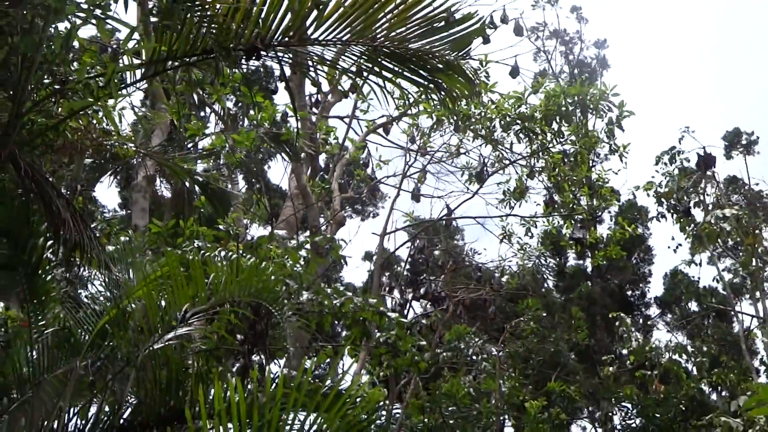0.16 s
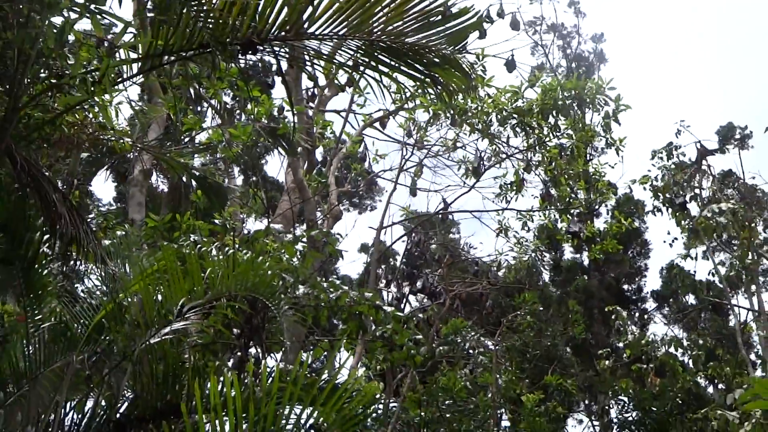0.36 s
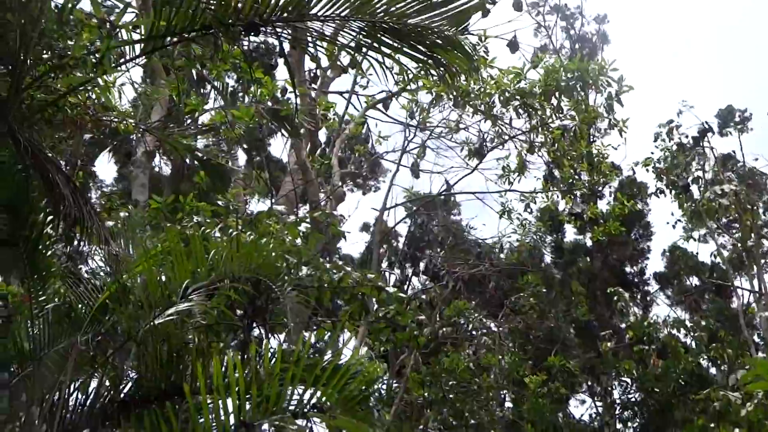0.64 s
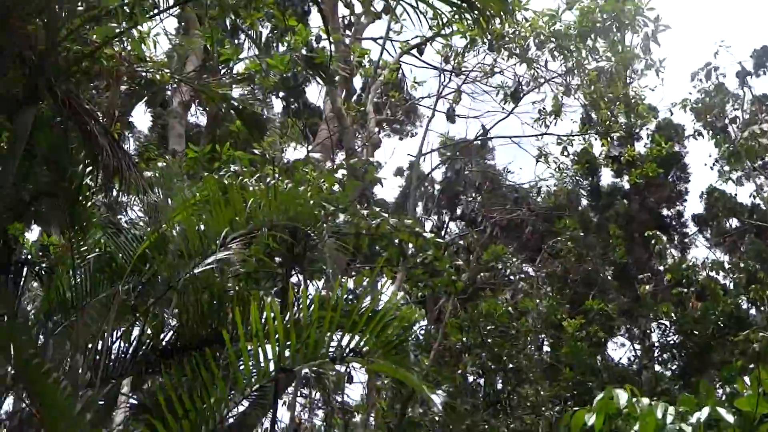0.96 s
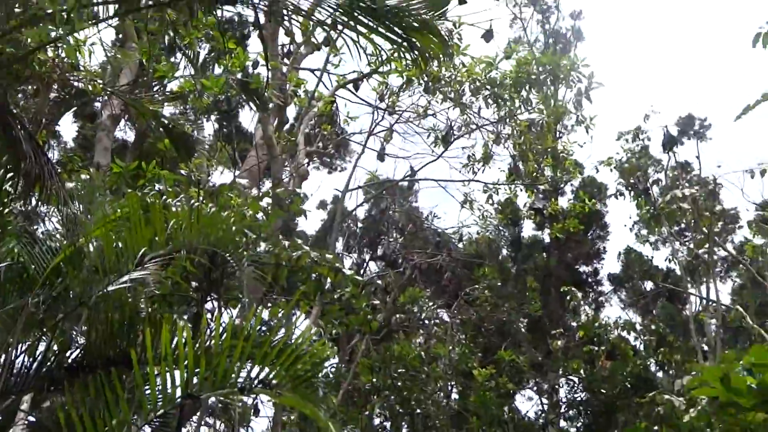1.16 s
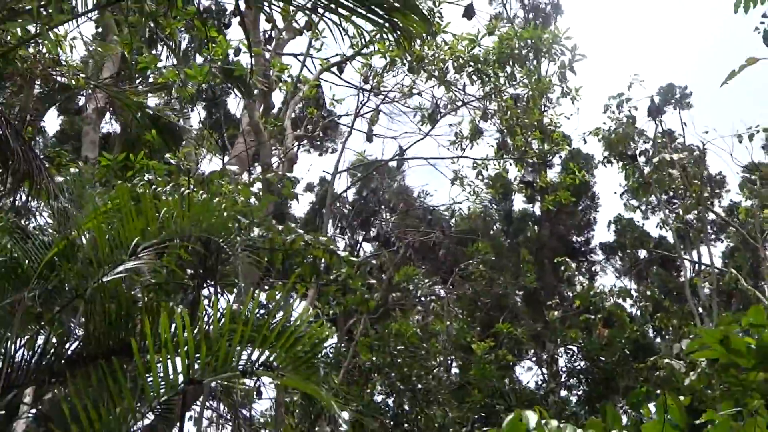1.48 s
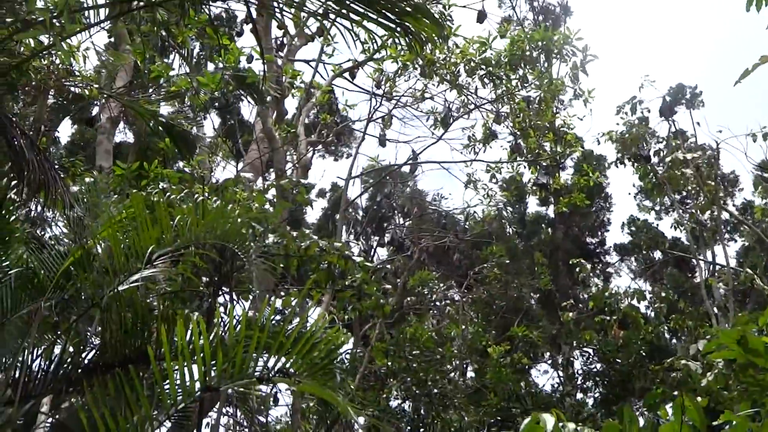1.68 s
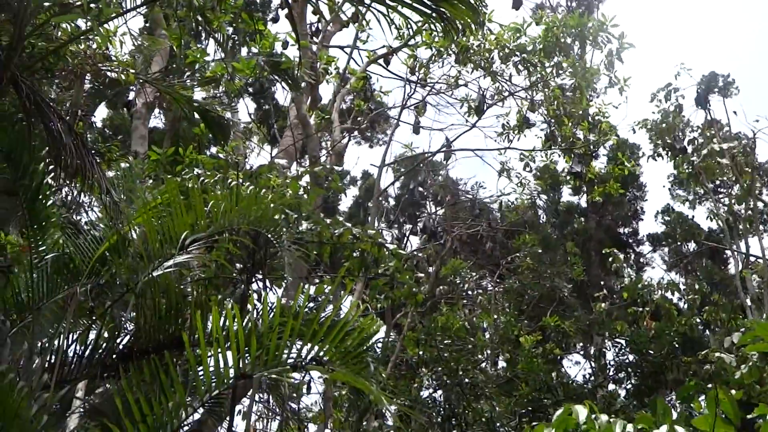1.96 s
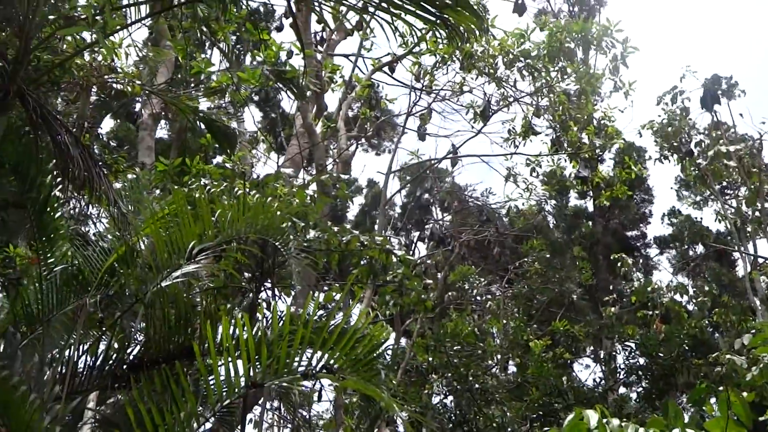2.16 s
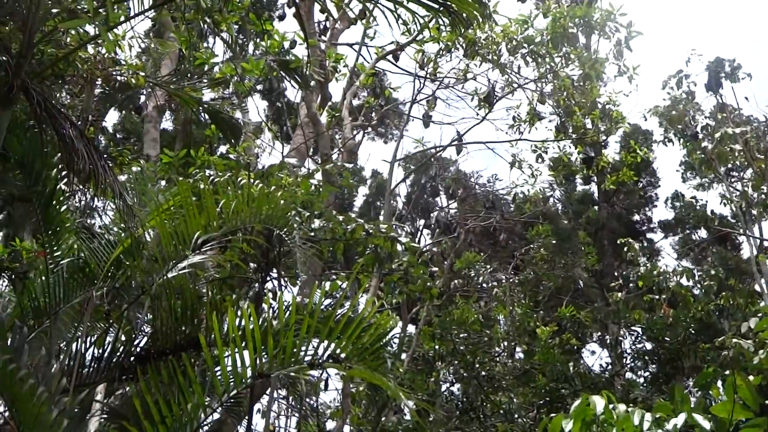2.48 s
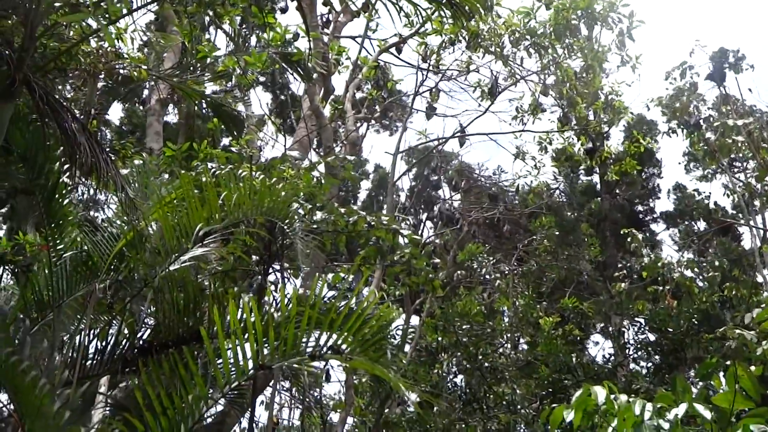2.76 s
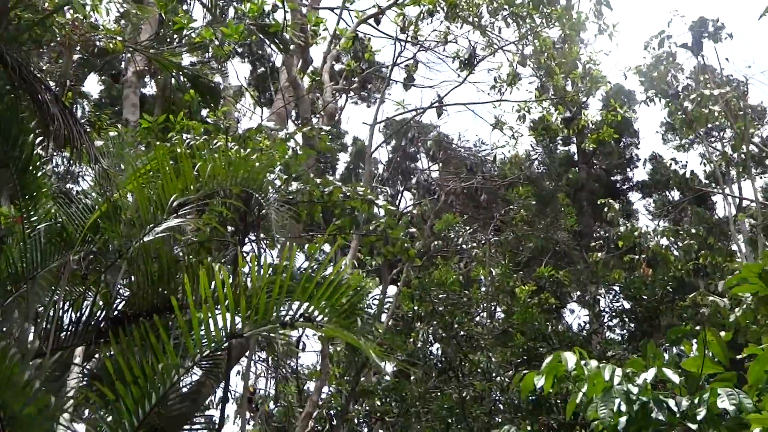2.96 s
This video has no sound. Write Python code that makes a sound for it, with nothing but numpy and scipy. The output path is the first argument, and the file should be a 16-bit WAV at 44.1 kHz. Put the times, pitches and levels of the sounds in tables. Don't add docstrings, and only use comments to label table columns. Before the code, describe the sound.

Harsh bat screeches and squeals, then quick chattering notes, above insect buzz and soft forest wash.

```python
import sys
import numpy as np
from scipy import signal
from scipy.fft import rfft, irfft
from scipy.io import wavfile
from scipy.ndimage import uniform_filter1d

SR = 44100
rng = np.random.default_rng(int(sys.argv[2]) if len(sys.argv) > 2 else 0)


def inscribe(sig):
    pcm = np.round(np.clip(np.atleast_2d(sig).T, -1, 1) * 32767)
    wavfile.write(sys.argv[1], SR, pcm.astype(np.int16))


def decibels_to_gain(level_db):
    exponent = np.asarray(level_db, float) / 20
    return 10 ** exponent


N = 138033


def evened(x):
    return x / np.sqrt(np.mean(x ** 2) + 1e-20)


def read(points, hz):
    f, value = np.transpose(points)
    return np.interp(np.log(hz + 1), np.log(f + 1), value)


def add(mix, s, sound):
    part = mix[round(s * SR):][:len(sound)]
    part += sound[:len(part)]


def wander(length, seconds):
    size = max(int(seconds * SR), 1)
    drift = uniform_filter1d(rng.standard_normal(length + SR // 10), size)
    return evened(uniform_filter1d(drift, size))[:length]


def resonate(x, hz, width):
    turn = np.exp(2j * np.pi * np.cumsum(hz * np.ones(len(x))) / SR)
    r = np.exp(-np.pi * width / SR)
    return 2 * (turn * signal.lfilter([1 - r], [1, -r], x / turn)).real


def resonate_twice(x, hz, width):
    return resonate(resonate(x, hz, width), hz, 2 * width)


def follow(points):
    s, hz, db, *more = np.transpose(points)
    t = np.arange(s[0], s[-1], 1 / SR)
    ends = np.minimum(np.minimum(t - s[0], s[-1] - t) / 0.0024, 1)
    return s[0], np.interp(t, s, hz), ends * decibels_to_gain(np.interp(t, s, db)), *(np.interp(t, s, m) for m in more)


def wash():
    # pitch_hz, level_db per Hz
    wash_curve = [(25, -44), (100, -20), (280, -6.5), (650, -2.5), (1400, -7), (3500, -12), (8000, -16),
                  (15600, -29.5)]
    # pitch_hz, likeness (0-1)
    likeness_curve = [(60, .995), (500, 0.93), (1000, 0.86), (6000, 0.88), (13000, 0.98)]
    # pitch_hz, level_db
    lean_curve = [(250, 0), (1000, 1), (8000, -0.7)]
    # pitch_hz, phase_radians
    lead_curve = [(0, 0), (130, 0.13), (1550, 0.47), (4390, 0.13), (7320, 0.42), (15300, 0.13)]
    hz = np.fft.rfftfreq(1024, 1 / SR)
    a, b, c, d, patches = rng.standard_normal((N // 256 + 5, 513, 5)).T
    patches = evened(uniform_filter1d(uniform_filter1d(patches, 10, 0), 12, 1))
    same = np.clip(read(likeness_curve, hz), -1, 1)[:, None]
    lean = decibels_to_gain(read(lean_curve, hz)[:, None] / 2)
    lead = np.exp(1j * read(lead_curve, hz))[:, None]
    left = a + 1j * b
    right = same * left + np.sqrt(1 - same ** 2) * (c + 1j * d)
    z = np.array([left * lean * lead, right / lean])
    z *= decibels_to_gain(read(wash_curve, hz)[:, None] + 1.2 * patches)
    return decibels_to_gain(-42) * evened(signal.istft(z, nperseg=1024, noverlap=768)[1][:, :N])


def insects():
    # pitch_hz, width_hz, level_db
    bodies = [
        (6943, 190, -4),
        (7206, 630, 4.5),
    ]
    clicks_per_s, throb_hz, throb_db = 5000, 24, 0.5
    clicks = rng.standard_normal((3, N)) * (rng.random((3, N)) < clicks_per_s / SR)
    rung = np.array([sum(decibels_to_gain(db) * evened(resonate_twice(c, hz, w)) for hz, w, db in bodies) for c in clicks])
    throb = throb_db * np.sin(2 * np.pi * np.cumsum(throb_hz * (1 + 0.079 * wander(N, 0.18))) / SR)
    return decibels_to_gain(-41.5 + throb) * evened(rung[0] + 0.24 * rung[1:])


def note(hz, rise, fall):
    t = np.arange(0, rise + 6 * fall, 1 / SR)
    droop = 0.0086 * (1 - t / (rise + fall))
    turns = np.cumsum(hz * (1 + droop)) / SR
    swell = np.sin(np.pi / 2 * np.minimum(t / rise, 1)) ** 2
    fade = np.cosh(np.maximum(t - rise, 0) / fall) ** 2
    return swell / fade * np.sin(2 * np.pi * turns)


def mutter():
    # start_s, level_db
    colony_level = [
        (0, -51),
        (.05, -50),
        (.09, -51.5),
        (.9, -47),
        (1.45, -52.5),
        (1.82, -49),
        (1.92, -43),
        (2.1, -44),
        (2.781, -51),
        (3.13, -51),
    ]
    bats, chirps_per_s = 24, 900
    out = np.zeros((2, N))
    for pitch, size, side in rng.standard_normal((bats, 3)):
        train = (rng.random(N) < chirps_per_s / bats / SR) * decibels_to_gain(0.81 * rng.exponential(1, N))
        rise, fall = 0.0071 * np.exp(0.31 * size), 0.017 * np.exp(0.5 * size)
        chirp = note(2400 * np.exp(0.0761 * pitch), rise, fall)
        out += signal.oaconvolve(train, chirp)[:N] * decibels_to_gain(1.7 * side * np.array([[1], [-1]]))
    s, db = np.transpose(colony_level)
    return evened(out) * decibels_to_gain(np.interp(np.arange(N) / SR, s, db))


def moan(points, width):
    s, hz, gain = follow(points)
    air = rng.standard_normal(len(hz))
    tone = 2 * np.sin(2 * np.pi * np.cumsum(hz) / SR) * 10 / width
    return s, gain * evened(resonate_twice(evened(air + tone), hz, width))


def moans():
    # start_s, pitch_hz, level_db
    held_calls = [
        [(.3, 2087, -41), (.325, 2164, -38), (.42, 2095, -45), (.6, 1970, -52.5)],
        [(1.25, 2120, -55), (1.39, 2114, -43), (1.44, 2152, -45.5), (1.52, 2212, -40), (1.56, 2180, -44),
         (1.585, 2130, -37), (1.61, 2200, -41), (1.66, 2240, -38)],
        [(2.82, 2000, -46.5), (2.9, 2176, -42), (2.93, 2066, -49), (3.02, 2064, -41), (3.13, 2080, -55)],
        [(2.23, 2710, -44), (2.31, 2666, -45), (2.34, 2910, -42), (2.38, 2580, -57), (2.47, 2710, -44)],
        [(1.995, 3360, -47), (2.015, 3700, -44), (2.055, 3100, -42)],
        [(.256, 3640, -48), (.282, 2990, -31.5), (.3, 2570, -40)],
        [(2.195, 2077, -55), (2.21, 1950, -35), (2.23, 2120, -54)],
        [(2.215, 2330, -41), (2.3, 2330, -41.5), (2.47, 2202, -45), (2.7, 2134, -51)],
        [(.432, 3380, -44), (.445, 3050, -42), (.458, 2530, -46)],
        [(.398, 2524, -40), (.43, 2587, -44)],
        [(.3, 2890, -54), (.355, 2760, -55)],
        [(.86, 2920, -40), (.894, 2860, -32.5), (.962, 3000, -47), (1., 2920, -36), (1.014, 2920, -53),
         (1.04, 2870, -35.5), (1.066, 2850, -51), (1.088, 2720, -45), (1.15, 2900, -59)],
        [(1.16, 5330, -51), (1.37, 5130, -39), (1.536, 5260, -41.5), (1.65, 5400, -54)],
        [(2.93, 5160, -46), (3.02, 5230, -48), (3.13, 5050, -45)],
        [(1.41, 2600, -46), (1.46, 2730, -44.5), (1.53, 2670, -42.5), (1.6, 2670, -50)],
        [(.02, 2363, -52), (.058, 2266, -35.5), (.082, 2300, -58)],
        [(.905, 5980, -42), (.94, 5950, -40)],
        [(.62, 3120, -53), (.68, 2760, -44), (.72, 2680, -46), (.795, 2400, -46)],
        [(2.25, 5900, -46), (2.38, 5800, -47.5)],
    ]
    blur_widths = [70, 140, 280, 140, 380, 750, 110, 200, 130, 70, 150, 300, 380, 450, 350, 250, 130, 300,
                   900]
    out = np.zeros(N)
    for points, width in zip(held_calls, blur_widths):
        add(out, *moan(points, width))
    return out


def chatter():
    # middle_s, peak_db, pitch_hz, half_length_s
    chatter_notes = [(0.669, -30, 2710, 0.0072), (0.693, -30, 2830, .006), (1.23, -34.5, 2575, .005),
                     (1.245, -43, 2550, .005), (1.468, -27.5, 2608, .005), (1.486, -28.5, 2440, .005),
                     (1.513, -28, 2165, 0.0028), (1.531, -32, 2236, 0.0044), (1.601, -25, 2470, 0.0045),
                     (1.609, -20.5, 2450, 0.0056), (1.625, -22, 2446, 0.0074), (1.637, -27, 2320, 0.0049),
                     (1.683, -23.5, 2467, .005), (1.71, -34, 2400, 0.0052), (2.04, -36, 2440, 0.0033),
                     (2.054, -34, 2420, 0.0031), (2.066, -27, 2690, 0.0035), (2.078, -25, 2430, 0.0037),
                     (2.09, -25, 2463, .005), (2.108, -22, 2450, .007), (2.135, -27, 2380, .005),
                     (2.149, -22.5, 2436, 0.0069), (2.168, -25, 2450, .005), (2.177, -29, 2360, 0.0029),
                     (2.184, -31, 2390, .004), (2.208, -25.5, 2307, 0.0092), (2.27, -28, 2340, 0.0032),
                     (2.277, -37, 2330, 0.0051), (2.321, -32, 2240, 0.0049), (2.345, -26, 2400, .005)]
    out = np.zeros(N)
    for s, db, hz, half in chatter_notes:
        add(out, s - half, decibels_to_gain(db) * note(hz, half, 0.93 * half))
    return out


def squeal(points):
    overtone_levels = [0, -4, -10]
    s, hz, gain, bright_db = follow(points)
    turns = np.cumsum(hz * (1 + 0.009 * wander(len(hz), 0.0022))) / SR
    tone = 0
    for k, db in enumerate(overtone_levels):
        level_db = db + (k > 0) * bright_db + 2.4 * wander(len(hz), 0.0017)
        tone = tone + decibels_to_gain(level_db) * np.sin(2 * np.pi * (k + 1) * turns) * ((k + 1) * hz < 14500)
    return s, np.sqrt(2) * gain * tone


def squeals():
    # start_s, pitch_hz, level_db, brightness_db
    clean_squeals = [
        [(.085, 3420, -40, -3), (.1, 3560, -45, 3), (.117, 3890, -42, 8)],
        [(.108, 5430, -40, -6), (.125, 5890, -37, -9), (.14, 5750, -42, -11), (.158, 5140, -38, -9)],
        [(.153, 4840, -56, 7), (.168, 4470, -48, 3), (.19, 4810, -50, 11), (.21, 4660, -38, 1),
         (.235, 4560, -32.5, -4.5), (.247, 4400, -36, 5), (.258, 4020, -40, 0)],
        [(.531, 4960, -41, -16), (.547, 5250, -34.5, 0), (.555, 4310, -45, 11), (.57, 4270, -45.5, 5),
         (.62, 4080, -57, -16)],
        [(.808, 3280, -46, -6), (.822, 3390, -42.5, 8), (.838, 3420, -46, -8)],
        [(.832, 3080, -40, -6), (.85, 2990, -40.5, 1), (.872, 2840, -33, 1)],
    ]
    out = np.zeros(N)
    for points in clean_squeals:
        add(out, *squeal(points))
    return out


def patchy(x):
    z = signal.stft(x, nperseg=256)[2]
    field = rng.standard_normal(z.shape)
    field = evened(uniform_filter1d(uniform_filter1d(field, size=7, axis=0), size=6, axis=1))
    return signal.istft(z * decibels_to_gain(2.2 * field), nperseg=256)[1][:len(x)]


def screech(start, length, level_db, hz, far):
    near_partials = [-3.5, -4.5, -13, -15]
    far_partials = [-22, -7, -17, -21]
    # pitch_hz, level_db
    near_throat = [(1800, -22), (2900, -8), (4200, -8.5), (5800, -6.5), (7500, -6), (10300, -6.5),
                   (13500, -8), (15600, -15.5)]
    # pitch_hz, level_db
    far_throat = [(1800, 19), (3500, -10.5), (4500, -1.5), (5900, -1), (7500, -1), (9560, -8), (12000, -15),
                  (15600, -23)]
    attack_s, release_s, flutter_s = 0.012, 0.021, 0.006
    slow = 1 + 7 * np.clip(far, 0, 1) ** 2 * min(length / 0.33, 1) ** 2
    t = np.arange(0, length + 5 * release_s * slow, 1 / SR)
    pitch = hz * (1 + 0.1 * np.exp(-t / 0.02) - 0.15 * t + 0.03 * wander(len(t), 0.0014))
    turns = np.cumsum(pitch) / SR
    folds = 0
    for k, db in enumerate((1 - far) * np.array(near_partials) + far * np.array(far_partials)):
        flutter = 3 * wander(len(t), flutter_s / 4 * (1 + k))
        folds = folds + decibels_to_gain(db + flutter) * np.cos(2 * np.pi * (k + 1) * turns) * ((k + 1) * hz < 14000)
    puffs = (0.2 + np.exp(-(turns % 1) / 0.21)) * rng.standard_normal(len(t))
    f = np.fft.rfftfreq(len(t), 1 / SR)
    throat = decibels_to_gain((2 - far) * read(near_throat, f) + far * read(far_throat, f)) * (f > 1700)
    voice = folds + evened(patchy(irfft(rfft(puffs) * throat, len(t))))
    attack = np.minimum(t / (attack_s * slow), 1)
    release = np.exp(-np.maximum(t - length, 0) / (release_s * slow))
    return start, voice * attack * release * decibels_to_gain(level_db + 1.3 * wander(len(t), flutter_s))


def screeches():
    # start_s, length_s, level_db, pitch_hz, distance (0-1)
    harsh_cries = [(0.091, 0.17, -40, 5460, 0.15), (.263, 0.024, -33, 2700, 0.43),
                   (0.388, 0.051, -37, 2895, 0.5), (0.558, 0.077, -38, 5600, .0),
                   (0.637, 0.055, -35, 2800, 0.1), (0.82, 0.28, -35, 2960, 0.1),
                   (1.114, 0.31, -36.5, 2656, 0.68), (1.425, 0.22, -40.5, 2727, 0.93),
                   (1.999, 0.069, -40.5, 2304, 0.72), (2.079, 0.12, -45, 2376, 0.88),
                   (2.242, 0.15, -45, 2790, 0.99), (2.825, 0.034, -42.5, 2620, 1),
                   (2.892, 0.017, -35.5, 2555, 1.), (2.944, 0.15, -40.5, 2587, 1),
                   (0.295, 0.1, -43.5, 2670, 0.34), (0.713, 0.13, -46.5, 2670, 0.23),
                   (2.388, 0.27, -48, 2557, 1)]
    out = np.zeros(N)
    for row in harsh_cries:
        add(out, *screech(*row))
    return out


def forest(x):
    t60_s, first_echo_s, alike = 0.87, 0.01168, 0.9
    size = SR // 2
    taps = rng.standard_normal((3, size)) * (rng.random((3, size)) < 0.05)
    taps = taps * (np.arange(size) > first_echo_s * SR)
    both_sides = alike * taps[0] + np.sqrt(1 - alike ** 2) * taps[1:]
    hz, t, z = signal.stft(both_sides, SR, nperseg=256)
    hz = hz[:, None]
    z = z.mean(0) + (z - z.mean(0)) / (1 + (hz / 11000) ** 4)
    decay_db = -60 * t / t60_s * (1.5 + hz / 9000) - 1.6 * hz / 41000
    tail = signal.istft(z * decibels_to_gain(decay_db), SR, nperseg=256)[1]
    return signal.fftconvolve(x[None], tail / np.linalg.norm(tail[0]), axes=1)[:, :N]


def scene():
    held, right = moans(), chatter()
    bats = squeals() + screeches()
    side = np.array([[0.5], [-0.5]])
    direct = bats * decibels_to_gain(0.9 * side) + held * decibels_to_gain(1.2 * side) + right * decibels_to_gain(-4.5 * side)
    echoes = decibels_to_gain(-7) * forest(bats + held + 0.5 * right)
    return wash() + insects() + mutter() + direct + echoes


def roll_off(x):
    return signal.sosfilt(signal.butter(12, 15720, fs=SR, output="sos"), x)


def record(dry):
    return roll_off(dry)


dry = scene()
out = record(dry)
inscribe(out)
```